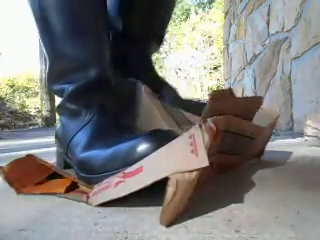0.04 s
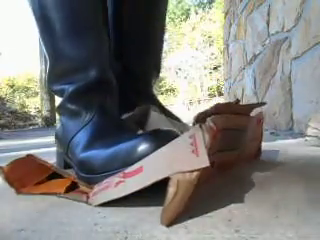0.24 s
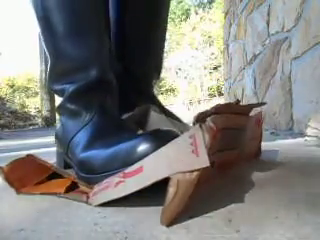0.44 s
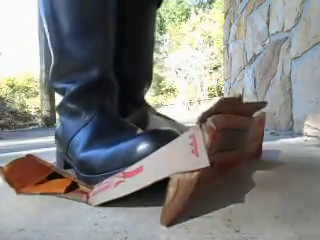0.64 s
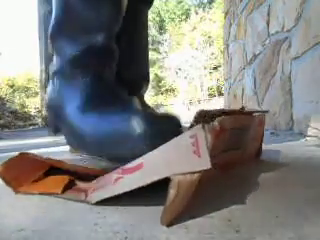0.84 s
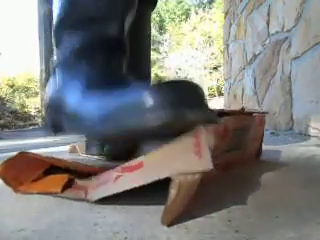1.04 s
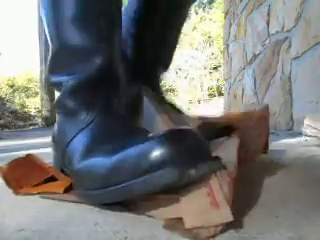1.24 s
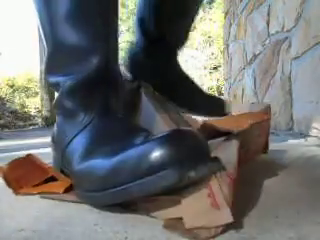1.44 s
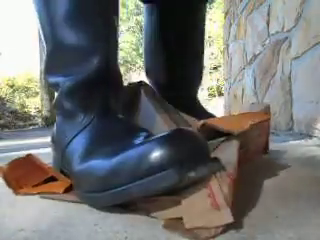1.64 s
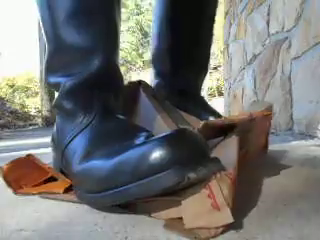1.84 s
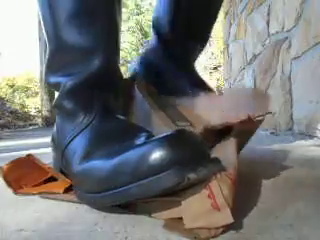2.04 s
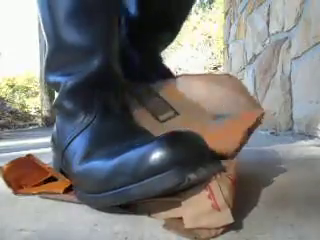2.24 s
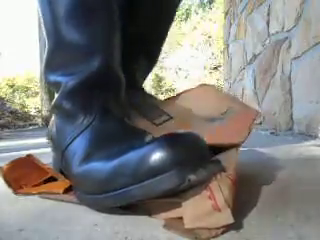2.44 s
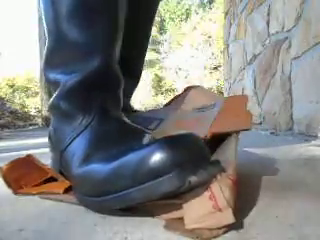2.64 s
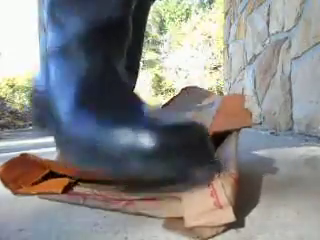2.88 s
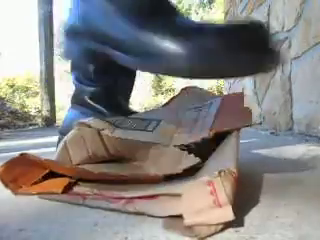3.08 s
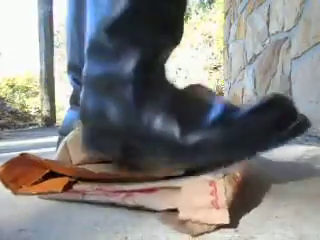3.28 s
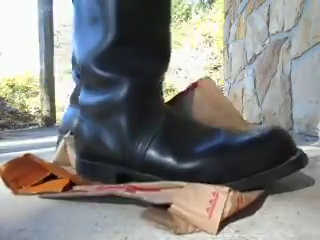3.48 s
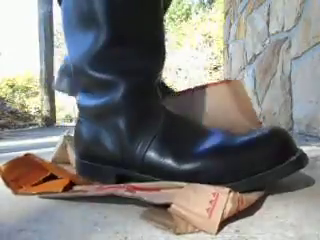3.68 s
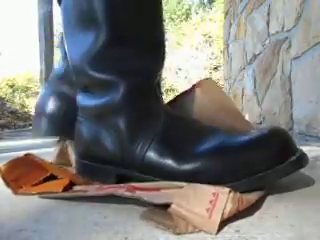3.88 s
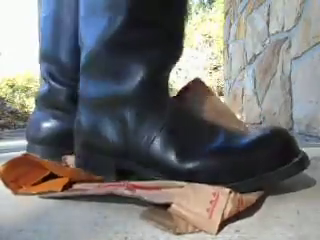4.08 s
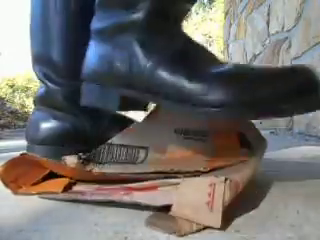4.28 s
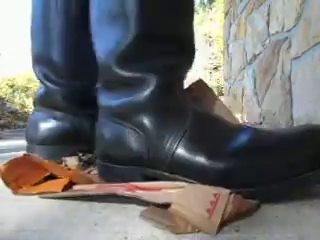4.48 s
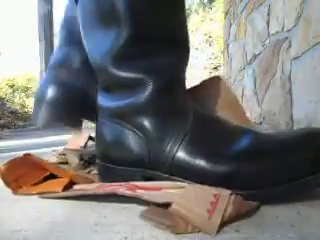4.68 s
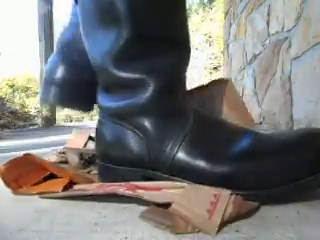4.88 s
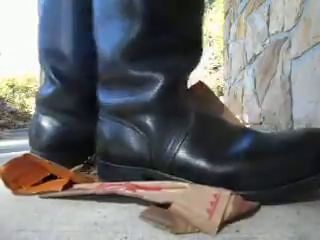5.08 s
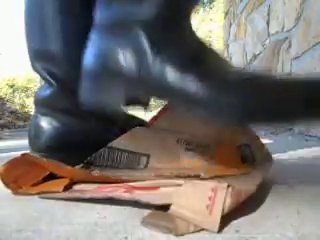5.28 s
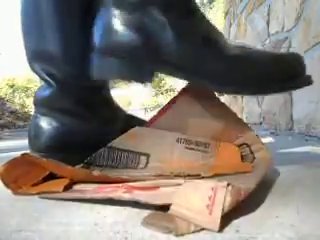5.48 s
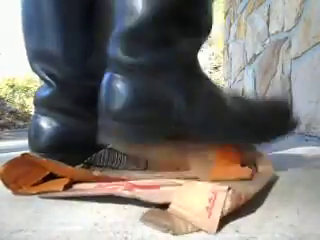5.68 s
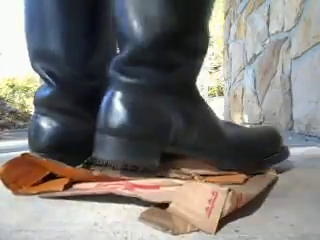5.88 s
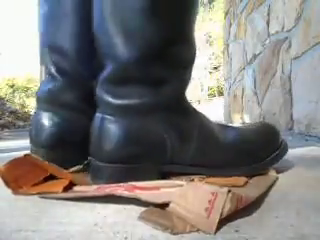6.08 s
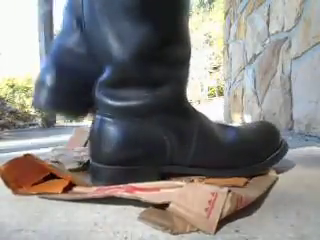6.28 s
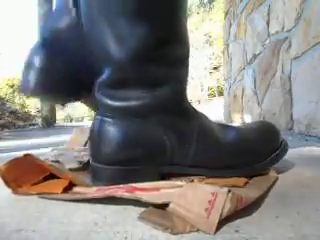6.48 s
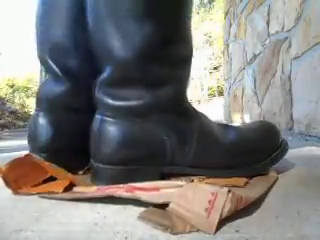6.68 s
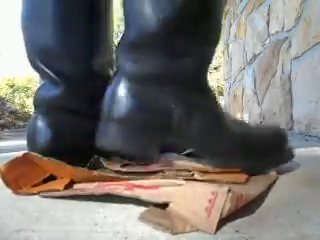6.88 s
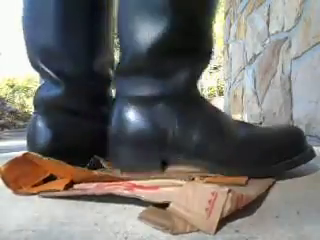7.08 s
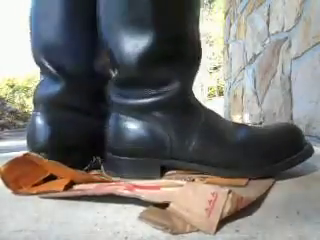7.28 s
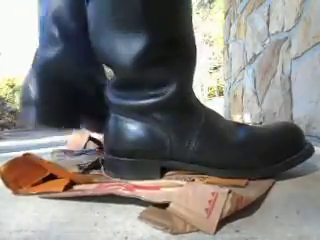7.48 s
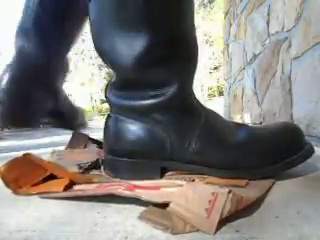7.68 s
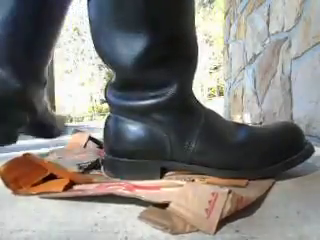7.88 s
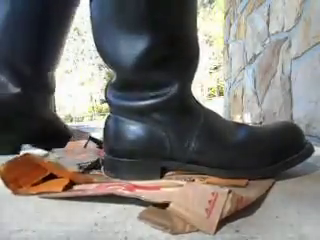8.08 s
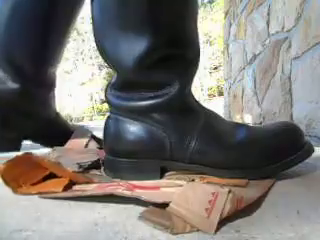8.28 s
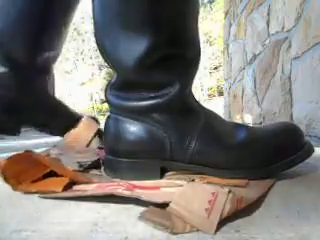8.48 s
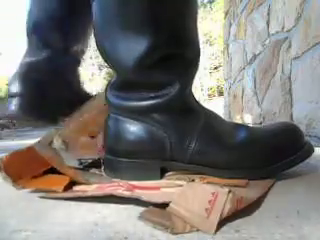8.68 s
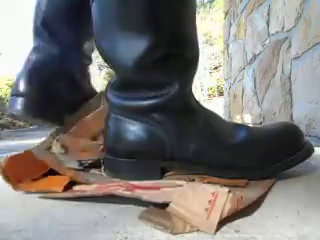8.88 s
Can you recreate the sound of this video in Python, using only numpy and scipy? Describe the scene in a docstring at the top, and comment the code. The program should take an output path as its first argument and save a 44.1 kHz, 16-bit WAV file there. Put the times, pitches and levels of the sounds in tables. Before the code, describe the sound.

Cardboard is crushed under boots in irregular bursts of tearing crackle, cracking folds and dull thuds, with a passing roar and faint whistles late on.

```python
"""Leather boots stomp and drag on flattened cardboard on a concrete porch, close to the microphone.
From the start, presses tear fibres in dense crackle, folds snap and ring the panels, lone fibres tick;
the loudest snaps overload the input. The background, a traffic hum of shaped noise under quiet rustle,
dips briefly near 1.5 s. Heels thud from 1.7 s, just after a first faint whistle. Leather creaks at 7.2 s,
a smooth roar swells around 7.6 s, more whistles follow, and one strong snap rings at 8.8 s."""
import sys
import numpy as np
from scipy import signal
from scipy.fft import rfft, irfft
from scipy.io import wavfile
from scipy.ndimage import uniform_filter1d

SR = 44100
rng = np.random.default_rng(int(sys.argv[2]) if len(sys.argv) > 2 else 0)


def dump_mix(stems):
    """Bounce the given channels to the path in sys.argv[1] as a 16-bit WAV at rate SR."""
    frames = np.atleast_2d(stems).T  # one column per channel
    limited = np.clip(frames, -1, 1)  # hard clip at full scale
    pcm = np.round(limited * 32767).astype(np.int16)
    wavfile.write(sys.argv[1], SR, pcm)


N = 393372

# sole pressing or dragging the board: start t/s, length t/s, fibre crackle level/dB, panel rumble level/dB
PRESSES = [(0.0, 0.1, -26.5, -21), (0.127, 0.07, -20.5, -19), (0.195, 0.054, -29.5, -26),
           (0.549, 0.28, -34, -38), (0.652, 0.084, -22, -26.5), (0.828, 0.037, -17, -25.5),
           (0.863, 0.061, -33.5, -38.5), (1.128, 0.2, -27, -27.5), (1.186, 0.028, -12.5, -14),
           (1.852, 0.11, -34, -39), (1.881, 0.039, -25, -29.5), (2.1, 0.29, -28, -29),
           (2.158, 0.025, -24, -18.5), (2.321, 0.11, -20.5, -21), (2.399, 0.28, -25, -26.5),
           (2.854, 0.12, -26.5, -28.5), (3.274, 0.028, -24, -24.5), (3.313, 0.083, -20, -17),
           (3.405, 0.024, -13.5, -12.5), (3.6, 0.19, -40.5, -34), (3.93, 0.12, -26, -22),
           (4.035, 0.18, -37, -28), (4.14, 0.061, -30, -25), (4.209, 0.088, -31, -33),
           (4.483, 0.11, -27.5, -28.5), (4.696, 0.082, -32.5, -32.5), (4.963, 0.19, -34, -34),
           (5.059, 0.027, -20.5, -18.5), (5.093, 0.052, -35, -25), (5.151, 0.16, -37.5, -42.5),
           (5.55, 0.11, -36.5, -34.5), (5.654, 0.059, -20, -16.5), (5.732, 0.058, -27, -23),
           (5.866, 0.059, -37, -33), (6.264, 0.044, -41, -31), (6.583, 0.17, -32.5, -34.5),
           (6.835, 0.17, -33, -41.5), (7.101, 0.064, -25, -30), (7.489, 0.031, -30, -44),
           (7.71, 0.054, -31, -31), (8.111, 0.025, -31.5, -35.5), (8.601, 0.11, -27.5, -33.5),
           (8.694, 0.098, -20, -28.5)]
# quiet rustle and rumble between presses, with a brief dip: t/s, fibre rustle level/dB, panel rumble level/dB
QUIET_LEVELS = [(0.35, -51, -54), (1.002, -48, -49), (1.471, -58, -75), (1.52, -51.5, -61.5),
                (1.699, -47.5, -48), (2.05, -38, -42.5), (2.8, -38, -41.5), (3.1, -50.5, -52),
                (4.4, -54, -49.5), (4.9, -49, -39.5), (5.8, -48, -52), (6.2, -49.5, -51),
                (7.35, -38.5, -35.5), (8.4, -43.5, -48)]
# folds that snap: t/s, crack peak level/dB, panel ring peak level/dB, ring f/Hz
SNAPS = [(0.1101, 9, 9, 1110), (0.1362, -1, 5.5, 490), (0.2542, -19, -14, 495), (0.668, -1, -1.5, 940),
         (0.8313, 0.5, -10.5, 1040), (1.228, 2.5, 1.5, 453), (1.2768, 17, 12, 1570),
         (1.3299, -7, -2.5, 1920), (1.898, -8, -18, 526), (2.146, 3.5, 0, 1360), (2.5595, -4, -1, 358),
         (2.6414, 14, -23, 2070), (2.6513, 4.5, -3.5, 853), (2.6882, -18, -7.5, 460), (2.885, 9, -8, 2290),
         (3.16, -10, -12.5, 750), (3.3095, 4, -0.5, 990), (3.384, -28, 5, 1270), (3.408, 4, 5, 470),
         (3.738, -16, -6, 343), (3.7784, -6.5, -9, 1150), (4.48, -20, -14, 420), (4.5163, -7, -5, 470),
         (4.5338, 0, -2, 328), (5.0173, -6, 0, 580), (5.587, 2, -9, 2000), (5.6527, 10, 0.5, 570),
         (5.688, 2, 1, 640), (5.7665, -11, 4, 670), (5.8473, -24, -10, 1110), (5.9579, -12, -8, 2050),
         (6.018, -33, -16.5, 980), (6.2804, -17, -10.5, 725), (6.7097, 11.5, -13, 720),
         (7.1367, -24, -8.5, 1540), (7.495, -6, -15.5, 1320), (7.753, -8, -8.5, 1500),
         (8.8012, -3, 15, 740), (8.882, -11.5, -9.5, 1270)]
# single fibres breaking: t/s, peak level/dB
FIBRE_TICKS = [(0.166, -8), (0.762, -7.5), (0.9009, -7.5), (1.0223, -11.5), (1.1026, -10.5), (1.2495, 10),
               (1.303, 0), (2.843, -8), (2.975, -5), (2.988, -12), (3.026, -9), (3.221, -12), (4.2193, 10),
               (4.2262, 2), (4.6597, -10.5), (4.749, -6), (4.809, -3.5), (5.19, -6.5), (5.3654, -9),
               (6.0532, -10.5), (6.271, -11), (6.7396, -9), (6.8036, -11.5)]
# soles landing: t/s, swing level/dB, starting f/Hz
THUDS = [(1.722, -14.5, 172), (3.405, -10, 79.6), (3.774, -6.5, 220), (3.798, -15, 146),
         (4.515, -14.5, 246), (5.032, -7.5, 198), (8.06, -30.5, 189)]
# boot leather slipping: start t/s, stop t/s, first slip rate f/Hz, last slip rate f/Hz, first tick level/dB
CREAK = (7.205, 7.268, 165, 215, -18)
# colour of torn fibre: f/Hz, level/dB
FIBRE_COLOUR = [(700, -11), (1800, -6.5), (2500, -5.5), (5000, -3), (9800, -1)]
# hollow board modes: f/Hz, width f/Hz, level/dB
PANEL_MODES = [(160, 256, -16), (358, 126, -15), (511, 126, -6.5), (683, 100, -14), (819, 66, -13.5),
               (1067, 197, -7.5), (1430, 300, -15.5)]
# decay of wall and porch: f/Hz, decay by 60 dB t/s
PORCH_T60 = [(200, .14), (1400, .08), (9000, .06)]
# swell as from a passing vehicle: centre t/s, Gaussian sigma t/s, top level/dB
ROAR_SWELL = (7.6, .36, -36.5)
# roar bands, each filter applied twice: f/Hz, width of one pass f/Hz
ROAR_BANDS = [(400, 150), (790, 300)]
# colour of the background hum: f/Hz, level/dB
TRAFFIC_COLOUR = [(28, 9), (85, 4.5), (200, -1.5), (400, -5), (850, -1), (1800, -7.5), (3200, -10),
                  (10000, -26)]
# background hum as heard, with a brief dip that recovers: t/s, level/dB
HUM_LEVELS = [(0, -51.5), (1.3, -52.5), (1.46, -58.5), (1.8, -48), (6.4, -47), (7.1, -44), (8.92, -44.5)]
# faint wavering whistles: start t/s, stop t/s, f/Hz, rms level before fades/dB
WHISTLES = [(1.65, 1.84, 2500, -58), (7.62, 7.78, 3380, -53), (7.79, 7.91, 2680, -54),
            (8.02, 8.5, 1922, -53)]
# microphone treble response: f/Hz, level/dB
MICROPHONE_RESPONSE = [(10300, 0), (11000, -13), (12200, -20)]

RISE_SHARE, EASE_S = 0.085, 0.004  # build-up as share of press length; smoothing window
SPRING_DB, SPRING_DB_PER_S = -15, -190  # drop on release, then slope as the board settles
TICK_T60_S = 0.007
BOARD_LOW_CUT_HZ, PORCH_DB = 75, -17
INPUT_CEILING, BAND_EDGE_HZ = 0.6, 12300


def crush():
    """Tearing fibres heard directly; steady noise and the tearing grain excite the panel modes."""
    whole = evened(tearing(rate_hz=200, spread_db=5, t60_s=0.008, hiss=0.55))
    # short and long fibres tick at their own pitch
    pitched = np.zeros(N)
    for hz in (1940, 2600, 4600, 9470):
        tears = tearing(rate_hz=70, spread_db=7.5, t60_s=0.028, hiss=0.56)
        band = evened(resonate(tears, hz, 0.57 * hz))
        pitched += amp(3.1 * drift(size=1500)) * band
    fibres = coloured(whole + 0.84 * pitched, FIBRE_COLOUR)

    excitation = rng.standard_normal(N) + 0.91 * whole
    # the board bends and folds, so each mode comes and goes
    panels = np.zeros(N)
    for hz, width_hz, db in PANEL_MODES:
        mode = evened(resonate(excitation, hz, width_hz))
        panels += amp(db + 5.0 * drift(size=1200)) * mode

    # between presses: mostly rubbing hiss, few tears
    rub = tearing(rate_hz=70, spread_db=5.5, t60_s=0.006, hiss=1.3)
    rub = evened(coloured(rub, FIBRE_COLOUR))
    panel_gain = np.hypot(pressure(column=3), quiet_gain(column=2))
    return (pressure(column=2) * steadied(fibres, size=2500)
            + quiet_gain(column=1) * rub
            + panel_gain * steadied(panels, size=2500))


def tearing(rate_hz, spread_db, t60_s, hiss):
    """Small noise bursts of very unequal size over a rubbing hiss."""
    size_db = spread_db * np.minimum(rng.exponential(1, N), 4)
    tears = amp(size_db) * (rng.random(N) < rate_hz / SR)
    fade = amp(-60 * np.arange(2000) / SR / t60_s)
    bursts = signal.oaconvolve(tears, fade * (1 - fade))[:N]
    return (hiss + evened(bursts)) * rng.standard_normal(N)


def pressure(column):
    """Press gain: each builds, holds, drops and settles; overlaps add in power."""
    power = np.full(N, 1e-9)
    for row in PRESSES:
        start_s, length_s, db = row[0], row[1], row[column]
        after_s = np.arange(-length_s, 0.5, 1 / SR)  # time since release
        rise = np.minimum((after_s + length_s) / (RISE_SHARE * length_s), 1)
        spring_db = (after_s > 0) * (SPRING_DB + SPRING_DB_PER_S * after_s)
        add(power, start_s, rise ** 2 * amp(2 * (db + spring_db)))
    size = round(EASE_S * SR)
    return np.sqrt(abs(uniform_filter1d(uniform_filter1d(power, size), size)))


def quiet_gain(column):
    """Gain of the quiet rustle or rumble heard between presses."""
    t_s, db = np.transpose(QUIET_LEVELS)[[0, column]]
    return amp(np.interp(np.arange(N) / SR, t_s, db))


def snaps():
    """A bright crack, then the buckled panel rings; louder and lower rings last longer."""
    out, t = np.zeros(N), np.arange(3000) / SR
    for start_s, crack_db, ring_db, hz in SNAPS:
        t60_s = 0.033 * amp(0.034 * max(ring_db, -25)) * (700 / hz) ** 0.73
        crack = coloured(rng.standard_normal(len(t)), FIBRE_COLOUR)
        crack *= amp(-60 * t / (0.6 * t60_s)) * np.minimum(t / 0.0003, 1)
        blow = rng.standard_normal(len(t)) * amp(-60 * t / t60_s) * np.minimum(t / 0.00075, 1)
        modes = sum(amp(db) * resonate(blow, f, width_hz) for f, width_hz, db in PANEL_MODES)
        ring = resonate(blow, hz, 0.34 * hz) + 0.79 * modes
        add(out, start_s, amp(crack_db) * peaked(crack) + amp(ring_db) * peaked(ring))
    return out


def ticks():
    """A breaking fibre: a thin dry burst of bright noise, over in milliseconds."""
    out, t = np.zeros(N), np.arange(1000) / SR
    for start_s, db in FIBRE_TICKS:
        noise = coloured(rng.standard_normal(len(t)), FIBRE_COLOUR)
        add(out, start_s, amp(db) * peaked(noise * amp(-60 * t / TICK_T60_S)))
    return out


def thuds():
    """A sole pushes air out of the board: a low swing, sinking in pitch, with a dull puff."""
    out, t = np.zeros(N), np.arange(5000) / SR
    attack = 1 - np.exp(-t / 0.0007)
    for start_s, db, hz in THUDS:
        swing = np.sin(2 * np.pi * hz * t * (1 - 2.5 * t)) * amp(-60 * t / 0.04)
        puff = evened(resonate(rng.standard_normal(len(t)), hz, hz))
        puff *= 0.5 * amp(-60 * t / 0.094)
        add(out, start_s, amp(db) * attack * (swing + puff))
    return out


def creak():
    """Leather stick-slip: regular ticks that speed up and weaken."""
    start_s, stop_s, first_hz, last_hz, db = CREAK
    share = np.linspace(0, 1, round((stop_s - start_s) * SR))
    cycles = np.cumsum(first_hz + (last_hz - first_hz) * share) / SR
    slips = np.diff(np.floor(cycles), prepend=-1) * (1 - 0.36 * share)
    fade = amp(-60 * np.arange(300) / SR / 0.0077)
    tick = coloured(rng.standard_normal(300), FIBRE_COLOUR) * fade
    out = np.zeros(N)
    add(out, start_s, amp(db) * np.convolve(slips, peaked(tick)))
    return out


def porch(x):
    """Sparse reflections of random sign, each band dying at its own speed."""
    taps = np.zeros(SR // 4)
    at = np.arange(160, len(taps) - 20, 20)
    taps[at + rng.integers(0, 20, len(at))] = rng.choice([-1., 1.], len(at))
    hz, t, z = signal.stft(taps, SR, nperseg=256)
    fade = amp(-60 * t / read(PORCH_T60, hz)[:, None])
    tail = signal.istft(z * fade, SR, nperseg=256)[1]
    return signal.oaconvolve(x, tail / np.linalg.norm(tail))[:N]


def roar():
    """Noise in two broad bands under a bell-shaped swell."""
    centre_s, sigma_s, db = ROAR_SWELL
    bands = np.zeros(N)
    for hz, width_hz in ROAR_BANDS:
        once = resonate(rng.standard_normal(N), hz, width_hz)
        bands += evened(resonate(once, hz, width_hz))
    swell = np.exp(-0.5 * ((np.arange(N) / SR - centre_s) / sigma_s) ** 2)
    return amp(db) * evened(bands) * swell


def whistles():
    """Faint sines with slightly wandering pitch, faded at both ends."""
    out = np.zeros(N)
    for start_s, stop_s, hz, db in WHISTLES:
        waver = drift(size=1500)[:round((stop_s - start_s) * SR)]
        whistle = np.sin(2 * np.pi * np.cumsum(hz * (1 + 0.004 * waver)) / SR)
        add(out, start_s, amp(db) * evened(whistle) * signal.windows.tukey(len(whistle), 0.5))
    return out


def traffic():
    """Background hum of far traffic: shaped noise whose heard level dips briefly, recovers and wavers."""
    hum = evened(coloured(rng.standard_normal(N), TRAFFIC_COLOUR))
    db = np.interp(np.arange(N) / SR, *np.transpose(HUM_LEVELS))
    return hum * amp(db + 0.55 * drift(size=3000))


def amp(db):
    """dB to amplitude ratio."""
    return 10 ** (np.asarray(db) / 20)


def evened(x):
    """Scales to rms 1."""
    return x / np.sqrt(np.mean(x ** 2) + 1e-20)


def peaked(x):
    """Scales to peak 1."""
    return x / abs(x).max()


def steadied(x, size):
    """Divides out slow level changes, keeps the grain."""
    return evened(x / np.sqrt(uniform_filter1d(x ** 2, size) + 1e-12))


def drift(size):
    """Slow random wander of rms 1: noise averaged twice over size samples."""
    return evened(uniform_filter1d(uniform_filter1d(rng.standard_normal(N), size), size))


def read(points, hz):
    """Interpolates a table on a log-frequency axis."""
    f, value = np.transpose(points)
    return np.interp(np.log(hz + 1), np.log(f + 1), value)


def coloured(x, points):
    """Filters by a spectrum in dB."""
    return irfft(rfft(x) * amp(read(points, np.fft.rfftfreq(len(x), 1 / SR))), len(x))


def resonate(x, hz, width_hz):
    """One two-pole resonance of peak gain 1."""
    return signal.lfilter(*signal.iirpeak(hz, hz / width_hz, SR), x)


def add(mix, start_s, sound):
    """Adds a sound in place, cut at the end of the mix."""
    part = mix[round(start_s * SR):][:len(sound)]
    part += sound[:len(part)]


def scene():
    """Boots on board, their porch reflections and the background."""
    boots = crush() + snaps() + ticks() + thuds() + creak()
    # thin board radiates no deep bass
    low_cut = signal.butter(2, BOARD_LOW_CUT_HZ, "high", fs=SR, output="sos")
    boots = signal.sosfilt(low_cut, boots)
    return (boots + amp(PORCH_DB) * porch(boots) + roar() + whistles() + traffic())[None]


def record(dry):
    """Hard-kneed input overload, treble roll-off, then the band limit."""
    clipped = dry / (1 + abs(dry / INPUT_CEILING) ** 6) ** (1 / 6)
    dulled = coloured(clipped[0], MICROPHONE_RESPONSE)[None]
    band_limit = signal.firwin(511, BAND_EDGE_HZ, window=("kaiser", 9), fs=SR)
    return signal.oaconvolve(dulled, band_limit[None], "same")


dry = scene()
out = record(dry)
dump_mix(out)
```